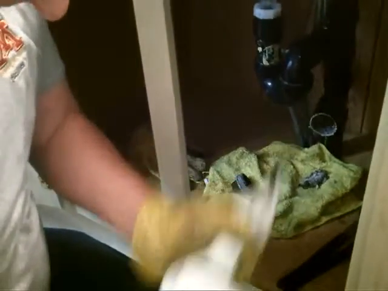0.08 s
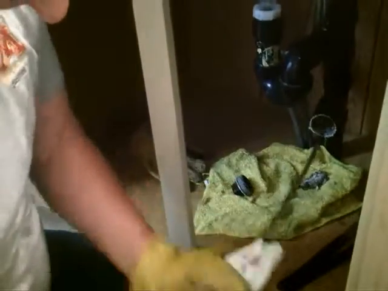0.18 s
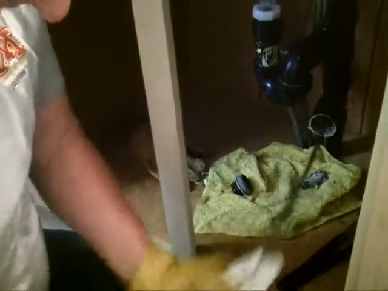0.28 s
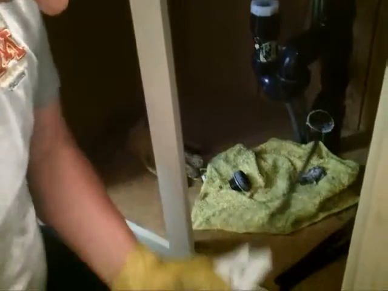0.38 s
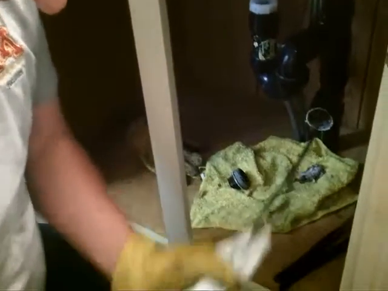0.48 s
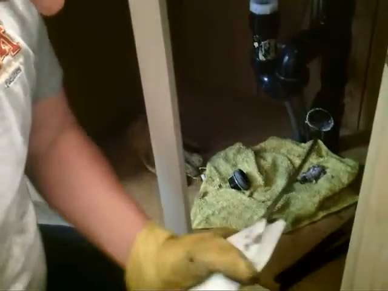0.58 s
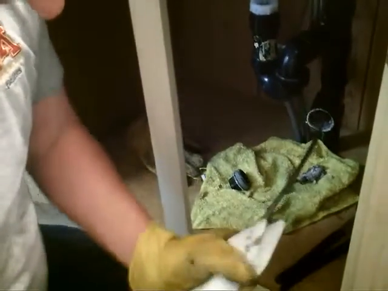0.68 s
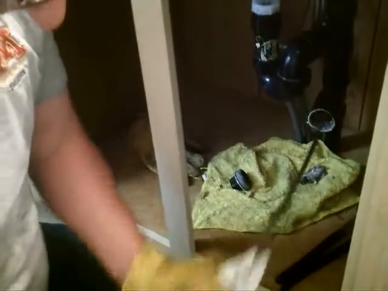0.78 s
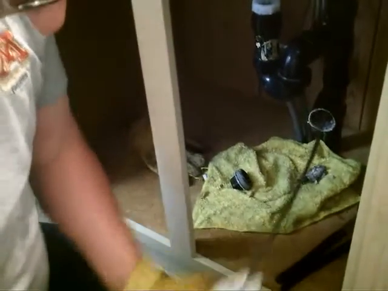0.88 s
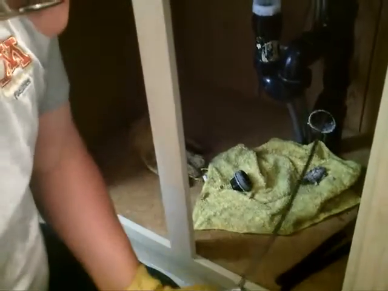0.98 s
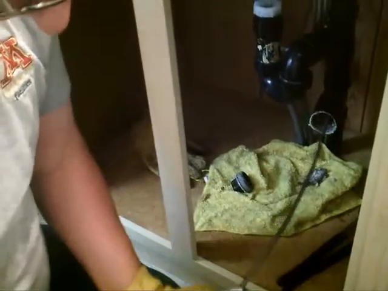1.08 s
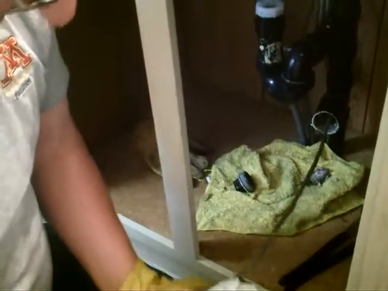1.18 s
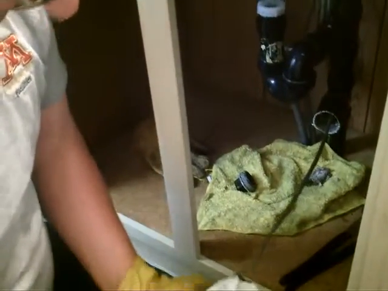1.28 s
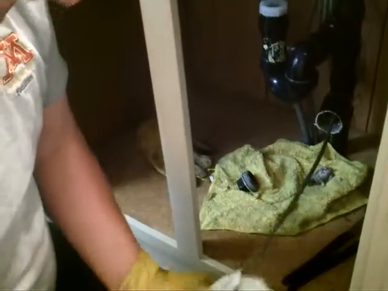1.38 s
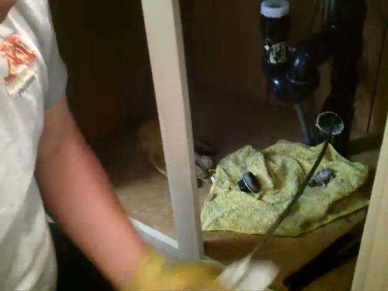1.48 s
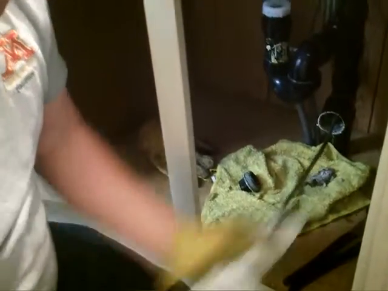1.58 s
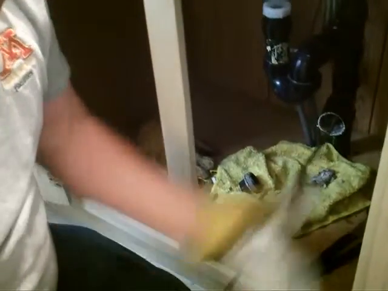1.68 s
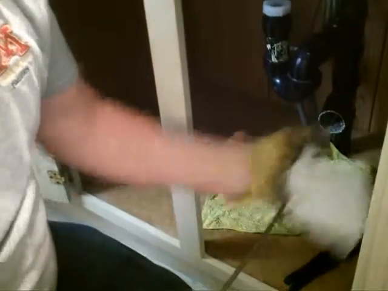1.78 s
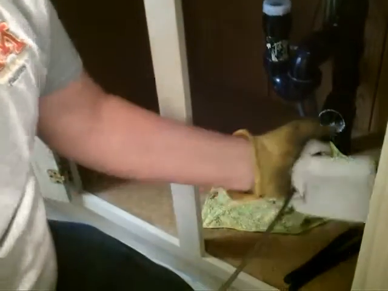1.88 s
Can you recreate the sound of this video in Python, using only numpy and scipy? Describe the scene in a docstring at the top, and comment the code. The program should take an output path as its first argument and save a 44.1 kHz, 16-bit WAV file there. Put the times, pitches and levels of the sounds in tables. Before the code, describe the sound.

A rag rubs a metal drain cable in two rough, zipping strokes, the cable knocking under a sink

```python
"""A rag wipes a coiled steel drain cable under a bathroom sink: a hard stroke zips over the coil turns,
its grit scraping and its cloth hissing. The cable then knocks on pipe and cabinet, a second hard stroke
scrapes, softer knocks follow, and a light third stroke starts with a faint zip of slipping turns.
Filtered random grains make the rub, smeared pulses the zip, ringing modes the knocks. Resonant noise booms
in the hollow cabinet with the strokes and knocks, the small room rings; hiss and a high whine run throughout."""
import sys
import numpy as np
from scipy import signal
from scipy.fft import rfft, irfft
from scipy.io import wavfile
from scipy.ndimage import uniform_filter1d

SR = 44100
rng = np.random.default_rng(int(sys.argv[2]) if len(sys.argv) > 2 else 0)


def amplitude_ratio(level_db):
    """Convert a level in decibels to the matching linear amplitude (field) ratio."""
    exponent = np.asarray(level_db, float) / 20
    return 10 ** exponent


def dump_mix(stems):
    """Bounce the given channels to the path in sys.argv[1] as a 16-bit WAV at rate SR."""
    frames = np.atleast_2d(stems).T  # one column per channel
    limited = np.clip(frames, -1, 1)  # hard clip at full scale
    pcm = np.round(limited * 32767).astype(np.int16)
    wavfile.write(sys.argv[1], SR, pcm)


N = 83790  # samples, 1.9 s
TOP_HZ = 15790  # upper edge of the sound


def unit(x):
    """Scale to rms 1."""
    return x / np.sqrt(np.mean(x ** 2))


def colour(x, points):
    """Filter to a spectrum of (f/Hz, level/dB) points, joined on a log frequency axis, at rms 1."""
    p = np.array(points, float)
    hz = np.maximum(np.arange(len(x) // 2 + 1) * SR / len(x), 1)
    level_db = np.interp(np.log(hz), np.log(p[:, 0]), p[:, 1])
    return unit(irfft(rfft(x) * amplitude_ratio(level_db), len(x)))


def curve(rows, col):
    """Gain along a dB column, silent outside the table."""
    r = np.array(rows, float)
    return amplitude_ratio(np.interp(np.arange(N) / SR, r[:, 0], r[:, col], left=-200, right=-200))


def flicker():
    """Quick changes of grip: random level steps, smoothed into ramps."""
    steps_per_s, step_spread_db = 70, 2.5  # spread before smoothing
    hold = int(SR / steps_per_s)
    steps = np.repeat(rng.standard_normal(N // hold + 1), hold)[:N]
    return amplitude_ratio(step_spread_db * uniform_filter1d(steps, hold))


def grit(per_s):
    """Dense uneven micro-slips: random clicks of either sign, the largest bounded."""
    spread_db = 2.5
    chance, side, size = rng.random((3, N))
    happens = chance < per_s / SR
    return happens * np.sign(side - .5) * amplitude_ratio(-spread_db * np.log(size + .002))


# Spectrum of grit on the steel: f/Hz, level/dB (per Hz)
SCRAPE_SPECTRUM = [(150, -56), (337, -25), (414, -8.5), (532, -3.5), (800, 1), (1200, -5.5), (1500, 3),
                   (1950, -1.5), (2300, -10.5), (3700, -11), (7000, -32.5), (12000, -56)]
# Spectrum of the cloth's hiss: f/Hz, level/dB (per Hz)
CLOTH_SPECTRUM = [(1500, -20.5), (3000, -4.5), (4000, -8), (5500, -7), (11000, -8), (15500, -12)]
# The hand on rag and cable, hard strokes and light shifting: t/s, scrape level/dB, cloth level/dB
HAND = [(0, -56, -94), (.06, -99, -81), (.178, -56.5, -65), (.19, -32, -53.5), (.222, -23.5, -30.5),
        (.258, -16.5, -31.5), (.296, -18, -28), (.312, -34.5, -39), (.334, -18, -35), (.352, -35.5, -50),
        (.41, -53.5, -54), (.63, -64.5, -68.5), (.66, -51, -52.5), (.7, -53, -55.5), (.73, -38.5, -64),
        (.845, -37.5, -50.5), (.875, -30.5, -42.5), (.925, -26.5, -43), (.94, -24, -31), (.965, -19.5, -37),
        (1.0, -15, -30), (1.03, -22, -32.5), (1.06, -19.5, -32.5), (1.085, -31, -46.5), (1.115, -54.5, -58),
        (1.24, -55.5, -65), (1.29, -47, -57.5), (1.42, -62.5, -62), (1.475, -52, -59.5), (1.52, -64, -66),
        (1.59, -53.5, -56.5), (1.67, -57.5, -55.5), (1.9, -54.5, -50.5)]
# The scrape's low half against its high half: t/s, level/dB
LOW_HALF = [(.0, 3), (.22, -2), (.33, 5), (.75, 13), (.98, -10), (1.08, 3.5), (1.62, 0), (1.9, -1)]


def rubbing():
    """Grit micro-slips scrape on the steel and finer ones hiss in the cloth, both following the hand."""
    split_hz = 1100
    scrape = colour(grit(per_s=5000), SCRAPE_SPECTRUM) * flicker()
    hz = np.arange(N // 2 + 1) * SR / N
    low = irfft(rfft(scrape) / (1 + (hz / split_hz) ** 4), N)
    high = scrape - low
    balanced = high + low * curve(LOW_HALF, col=1)
    cloth = colour(grit(per_s=10000), CLOTH_SPECTRUM) * np.sqrt(flicker())  # half the flicker in dB
    return balanced * curve(HAND, col=1) + cloth * curve(HAND, col=2)


# Coil turns passing the grip, one list per zip: t/s, turn rate f/Hz, zip level/dB
COIL_TURNS = [
    [(.235, 370, -42), (.258, 440, -23), (.278, 445, -23), (.288, 347, -21), (.312, 345, -24),
     (.324, 400, -26), (.35, 395, -40)],
    [(1.742, 400, -68), (1.758, 418, -55), (1.82, 470, -56), (1.855, 490, -55), (1.861, 580, -52),
     (1.9, 640, -45)],
]
# Spectrum of the zip: f/Hz, level/dB (per Hz)
ZIP_SPECTRUM = [(320, -20), (450, 0), (850, -3), (1900, -9), (4000, -25)]


def coil_zip():
    """Each coil turn that slips through the grip gives one smeared pulse, a sum of eight harmonics."""
    rate_scatter = .03  # rms share of the turn rate
    t = np.arange(N) / SR
    out = np.zeros(N)
    for rows in COIL_TURNS:
        r = np.array(rows, float)
        wobble = unit(uniform_filter1d(rng.standard_normal(N), size=150))
        turns_per_s = np.interp(t, r[:, 0], r[:, 1]) * (1 + rate_scatter * wobble)
        turn = np.cumsum(turns_per_s) / SR
        # the k * k / 2 phase smears each pulse
        pulses = sum(np.cos(2 * np.pi * k * turn + k * k / 2) for k in range(1, 9))
        out += colour(pulses, ZIP_SPECTRUM) * flicker() * curve(rows, col=2)
    return out


# Cable knocks: t/s, level/dB, tick level/dB (against the ring's peak), hardness (dB per octave)
KNOCKS = [(0.451, -39, -4, 2), (0.654, -35, -2.5, 5), (0.676, -34, -8, 6), (0.709, -10, -13, 0),
          (0.730, -18, -18, 2), (0.774, -14, -14, 2), (0.798, -19, -20, -3), (0.826, -20, -9, 5),
          (0.86, -23, -6, 2), (1.259, -25, -34, 3), (1.286, -30, -30, -2), (1.466, -45, -24, -4),
          (1.558, -41, -22, -4), (1.643, -41, -20, -14)]
# Modes that a knock rings: f/Hz, level/dB
KNOCK_MODES = [(480, 0), (760, 2), (900, 11), (1050, 8), (1620, 10), (1860, 7), (2110, 6), (2430, 3),
               (2700, 0)]


def knocks():
    """A contact of a few ms rings the modes, with a crisp tick and the shudder of the loose cable."""
    ring_t60_s, mode_scatter_db = .04, 2
    rise_s, tick_s, clatter_s = .0015, .005, .01  # time constants; the tick rises in a line
    clatter_gain = amplitude_ratio(-5.5) / 2
    out, t = np.zeros(N + 4096), np.arange(4096) / SR
    modes = np.array(KNOCK_MODES, float)
    mode_hz, mode_db = modes[:, 0], modes[:, 1]
    for start_s, level_db, tick_db, hardness in KNOCKS:
        scatter = mode_scatter_db * rng.standard_normal(len(modes))
        share = amplitude_ratio(mode_db + hardness * np.log2(mode_hz / mode_hz[0]) + scatter)
        cycles = mode_hz[:, None] * t + rng.random((len(modes), 1))
        ring = share @ np.sin(2 * np.pi * cycles) * np.exp(-np.log(1000) * t / ring_t60_s)
        body = ring * (1 - np.exp(-t / rise_s))
        # the scrape's spectrum, tilted by hardness between the lowest and highest mode
        tilted = [(hz, db + hardness * np.log2(np.clip(hz, mode_hz[0], mode_hz[-1])))
                  for hz, db in SCRAPE_SPECTRUM]
        rattle = colour(rng.standard_normal(len(t)), tilted)
        sharp = unit(np.gradient(np.gradient(rattle)))  # differencing twice lifts the treble
        tick = amplitude_ratio(tick_db) * sharp * np.minimum(t / rise_s, 1) * np.exp(-t / tick_s)
        clatter = clatter_gain * rattle * np.exp(-t / clatter_s)
        i = int(start_s * SR)
        out[i:i + len(t)] += amplitude_ratio(level_db) * (body / np.abs(body).max() + tick + clatter)
    return signal.sosfilt(signal.butter(2, 350, "high", fs=SR, output="sos"), out[:N])


# Resonances of the cabinet air: f/Hz, width of each pass f/Hz, level/dB
CABINET_AIR = [(210, 30, 2), (262, 45, 2)]
# The boom over time: t/s, level/dB
BOOM_LEVEL = [(.18, -80), (.222, -44.5), (.258, -66), (.315, -40.5), (.47, -78), (.69, -79), (.72, -42),
              (.79, -42), (.86, -54.5), (1.08, -49.5), (1.2, -74.5), (1.9, -83)]


def resonate(x, hz, width):
    """Two-pole resonance, gain 1 at the centre."""
    return signal.lfilter(*signal.iirpeak(hz, hz / width, fs=SR), x)


def boom():
    """The cable dragging in the cabinet stirs its hollow air: noise passes each resonance twice."""
    noise = rng.standard_normal(N)
    air = np.zeros(N)
    for hz, width, db in CABINET_AIR:
        air += amplitude_ratio(db) * resonate(resonate(noise, hz, width), hz, width)
    return unit(air) * curve(BOOM_LEVEL, col=1)


# Bands of the room's ring, each reaching up to the next: low edge f/Hz, decay by 60 dB t/s, level/dB
ROOM = [(162, 0.26, -6.5), (1480, 0.15, -11.5), (5960, 0.28, -46)]


def room(x):
    """Diffuse echoes from 4 ms on: band-passed noise, each band with its own decay."""
    t = np.arange(SR // 2) / SR
    tail = np.zeros(len(t))
    edges = [row[0] for row in ROOM] + [TOP_HZ]
    for (hz, t60_s, db), top in zip(ROOM, edges[1:]):
        band_pass = signal.butter(2, [hz, top], "band", fs=SR, output="sos")
        band = signal.sosfilt(band_pass, rng.standard_normal(len(t)))
        fade = np.exp(-np.log(1000) * t / t60_s) * (t > .004)
        tail += amplitude_ratio(db) * band * fade / np.sqrt(np.sum(fade ** 2))
    return signal.fftconvolve(x, tail)[:N]


# Spectrum of the background hiss: f/Hz, level/dB (per Hz)
HISS_SPECTRUM = [(18, -58), (30, -24), (130, -13), (341, -1.5), (1100, 3), (3400, -4), (15500, -9.5)]


def hiss():
    """Steady filtered noise, -58.5 dB rms."""
    return amplitude_ratio(-58.5) * colour(rng.standard_normal(N), HISS_SPECTRUM)


def whine():
    """A steady electric sine near the top of hearing, -68 dB rms."""
    whine_hz = 15735
    return amplitude_ratio(-68) * np.sqrt(2) * np.sin(2 * np.pi * whine_hz * np.arange(N) / SR)


def scene():
    """All sources in the room, over hiss and whine; one microphone feeds both channels."""
    sources = rubbing() + coil_zip() + knocks() + boom()
    return np.tile(sources + room(sources) + hiss() + whine(), (2, 1))


def roll_off(x):
    """The treble ends steeply here."""
    return signal.sosfilt(signal.butter(12, 16470, fs=SR, output="sos"), x)


def record(dry):
    """The camera cuts the top with a steep low-pass."""
    low_pass = signal.ellip(10, .2, 70, TOP_HZ, fs=SR, output="sos")
    mix = signal.sosfilt(low_pass, dry)
    return roll_off(mix)


dry = scene()
out = record(dry)
dump_mix(out)
```